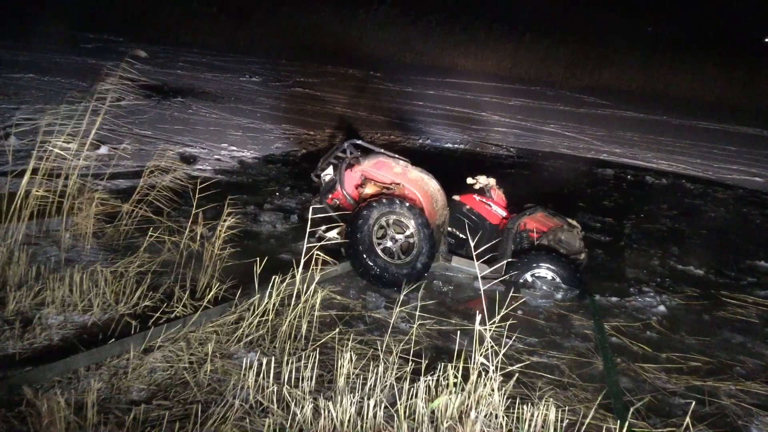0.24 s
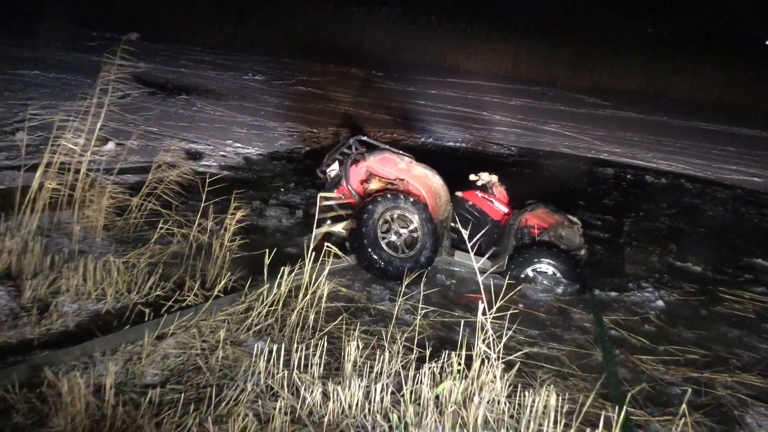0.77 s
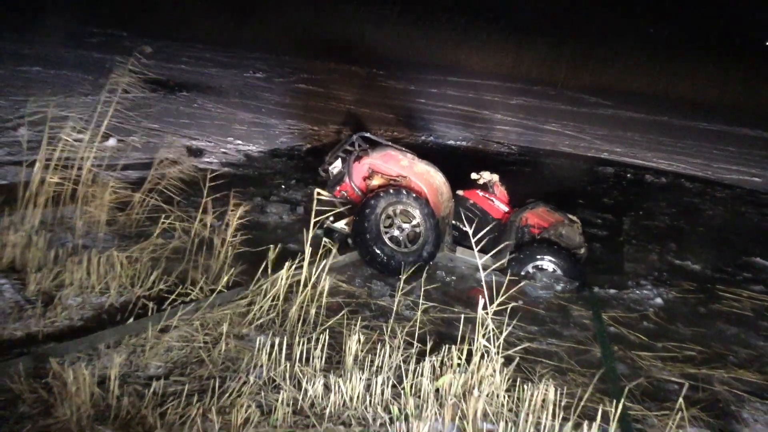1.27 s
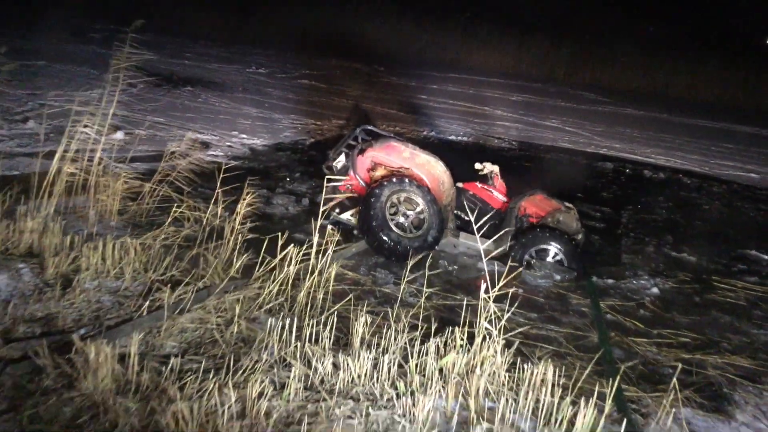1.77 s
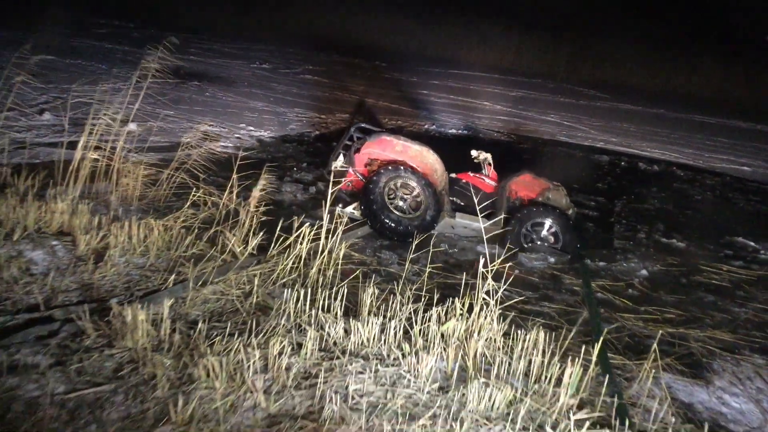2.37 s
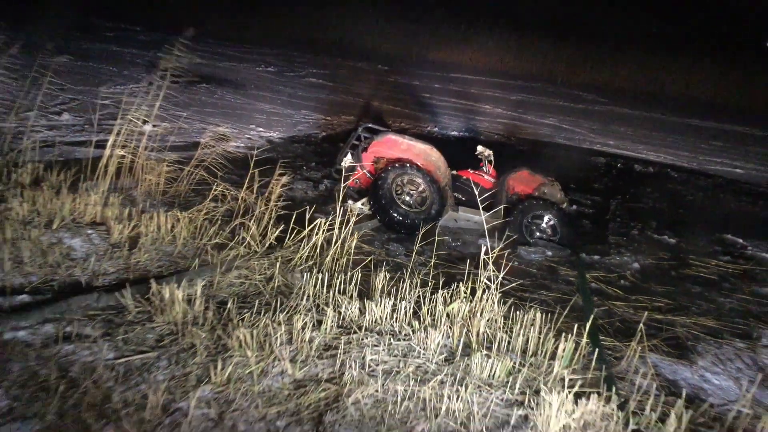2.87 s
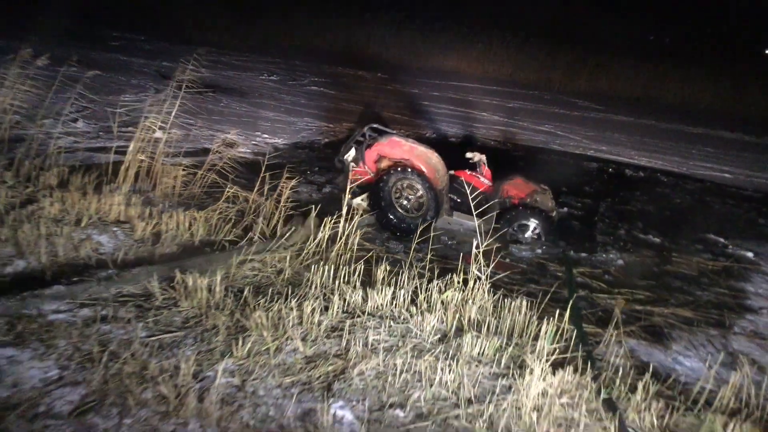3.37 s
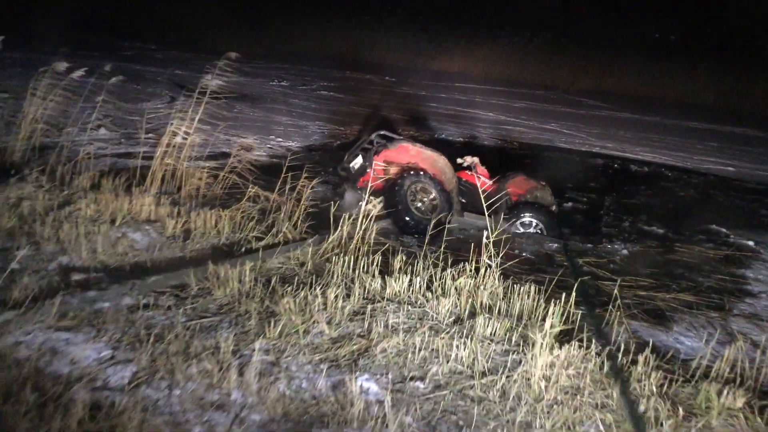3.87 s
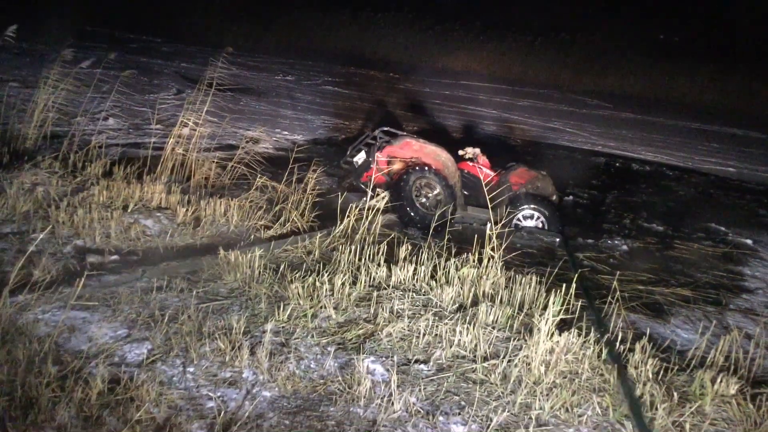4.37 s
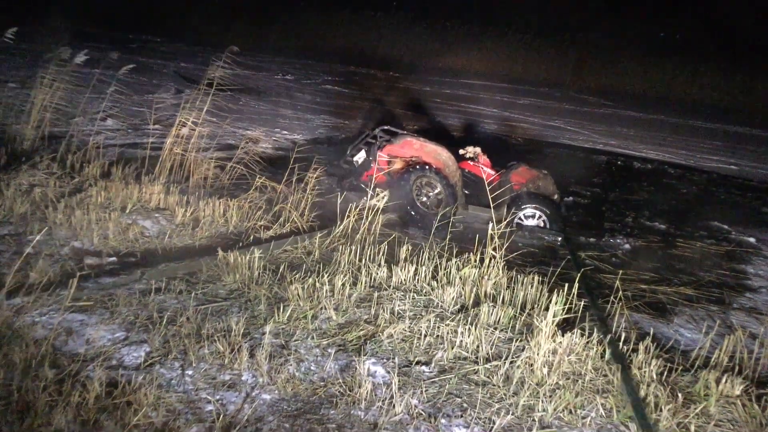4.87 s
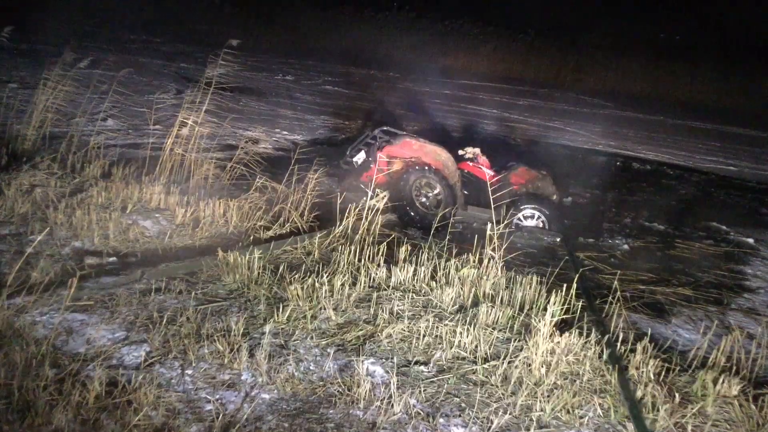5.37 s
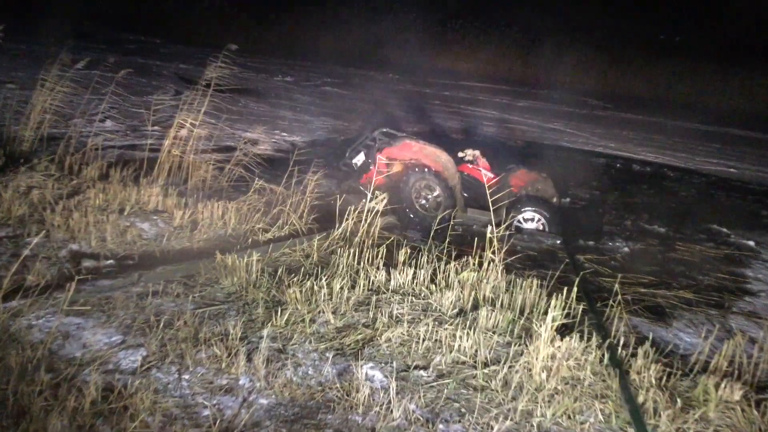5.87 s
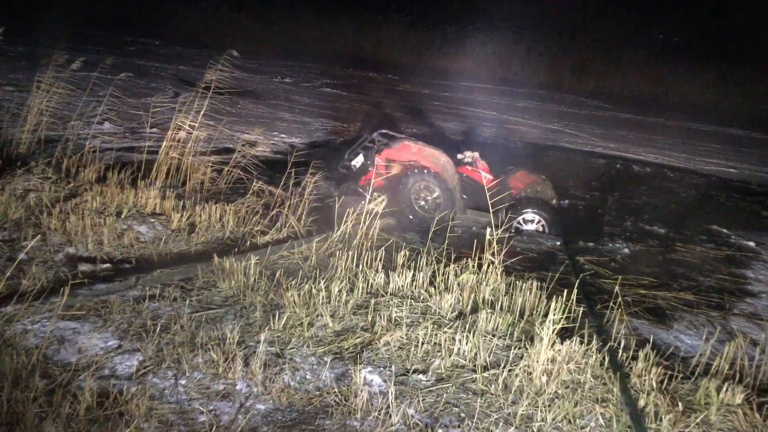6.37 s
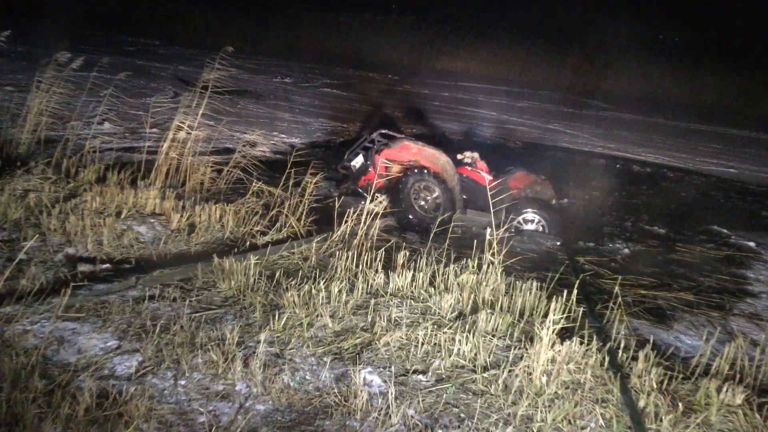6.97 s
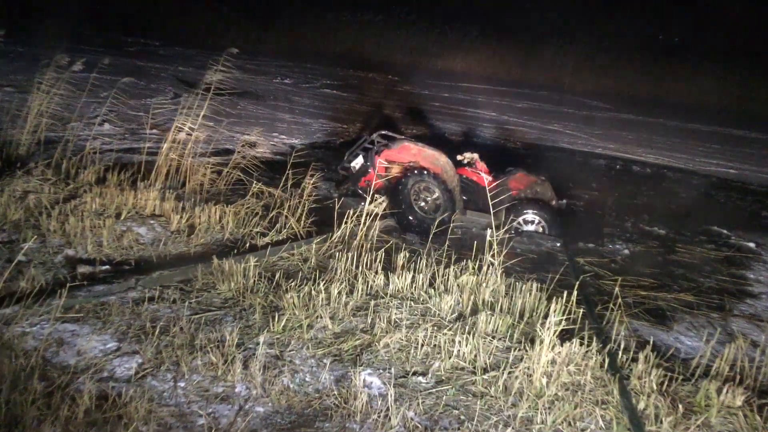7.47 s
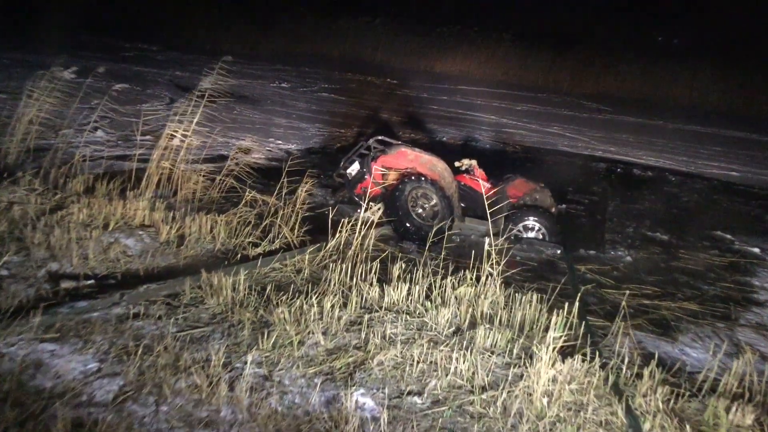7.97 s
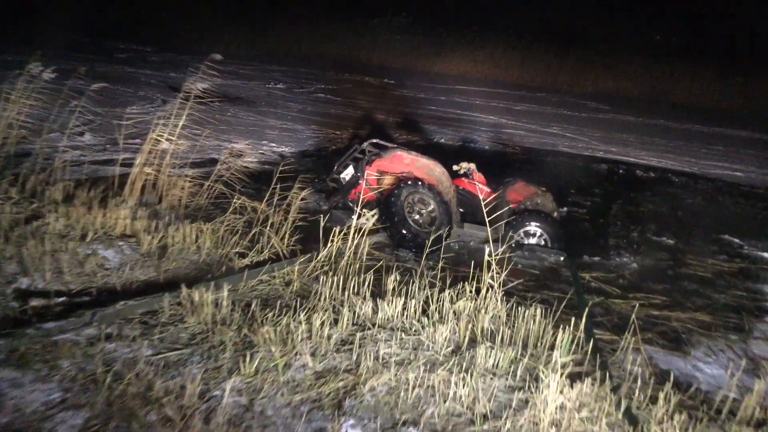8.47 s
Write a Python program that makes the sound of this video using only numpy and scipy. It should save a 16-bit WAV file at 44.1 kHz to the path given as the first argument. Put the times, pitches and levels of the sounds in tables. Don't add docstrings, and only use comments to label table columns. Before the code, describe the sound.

A small microphone, handled by its holder, picks up an engine a little way off in open night air. The engine sags, surges to an even throaty hum with rasp and faint hiss, stays there, then drops to slow uneven puffing. Close scuffs and tiny squeaks come first, then a run of low thuds with loose-part ticks, a loud near-clipping knock during the hold, and scattered bumps and brushes later.

```python
import sys
import numpy as np
from scipy import signal
from scipy.fft import rfft, irfft, next_fast_len
from scipy.io import wavfile
from scipy.ndimage import uniform_filter1d, map_coordinates

SR = 44100
rng = np.random.default_rng(int(sys.argv[2]) if len(sys.argv) > 2 else 0)


def to_linear_factor(level_db):
    exponent = np.asarray(level_db, float) / 20
    return 10 ** exponent


def persist_wave(psi):
    counts = np.round(np.clip(psi, -1, 1) * 32767).astype(np.int16)
    wavfile.write(sys.argv[1], SR, np.atleast_2d(counts).T)


N = 384993
STEP = 64

# start in seconds, length in seconds, level in dB, tilt in dB per octave.
SCUFFS = [
    (-.04, .14, -43.5, 0),
    (0.094, 0.1, -43.5, -2),
    (6.788, 0.18, -60.5, 6.5),
    (6.946, .25, -66, 7),
    (8.378, 0.17, -52, -3),
]
# frequency in Hz, level in dB.
RUSTLE_SPECTRUM = [(710, -40), (1200, -12), (1570, -2.5), (2590, -8), (3210, -2.5), (4110, -5.5),
                   (4430, -3.5), (5310, -12.5), (12900, -22.5), (15500, -53)]
# start in seconds, length in seconds, pitch in Hz, level in dB.
SQUEAKS = [(.012, .032, 3300, -36), (.018, .03, 1600, -36), (.035, .03, 4420, -40), (.033, .042, 2980, -39),
           (.053, .025, 1600, -41), (.068, .025, 3450, -43), (.097, .055, 3800, -43),
           (.128, .035, 2400, -43), (0, .018, 4400, -46), (.125, .035, 4400, -46), (.358, .005, 3600, -41),
           (.37, .006, 3350, -40), (6.82, .06, 3750, -54), (6.86, .11, 3780, -59.5), (6.95, .27, 3950, -62),
           (.632, .02, 4300, -45), (8.42, .11, 3250, -54), (8.42, .1, 3950, -56), (8.46, .07, 5050, -58),
           (8.45, .06, 6200, -62)]

# time in seconds, peak in dB.
TICKS = [(0.8587, -30.5), (0.8736, -41), (0.8838, -41.5), (0.9314, -37), (1.0523, -31.5), (1.0648, -42.5),
         (1.091, -39.5), (1.101, -34), (1.12, -36.5), (1.1383, -41), (1.2274, -42), (1.332, -36.5),
         (1.3697, -44), (3.9801, -26), (3.998, -36.5), (4.0335, -38.5), (4.0678, -44.5), (4.124, -38.5),
         (5.6784, -35), (5.7374, -43.5), (5.7446, -35), (5.763, -39.5), (5.8231, -45), (5.8778, -41.5),
         (5.8849, -39.5), (6.1486, -41), (6.7163, -40.5), (7.614, -42), (7.6333, -42), (8.2214, -45.5)]
# start in seconds, length in seconds, peak in dB, fading in dB per second.
RATTLES = [
    (1.1088, .15, -45, 30),
    (1.344, .2, -48, 0),
    (4.0081, .02, -27, 600),
    (5.6898, .07, -45, 20),
    (5.9186, .06, -43, 40),
    (6.6593, .03, -45, 0),
    (6.7613, .12, -50, 0),
    (7.342, .22, -47, 5),
    (7.6514, .02, -54, 0),
    (8.4831, .04, -51, 0),
]
# frequency in Hz, level in dB.
TICK_SPECTRUM = [(2000, -28), (4500, 0), (6000, -0.5), (9000, 3), (12500, -1), (15000, -11.5)]

# start in seconds, pitch in Hz, level in dB, decay in seconds.
BOOMS = [(0.821, 136, -21.5, 0.046), (1.03, 389.5, -17.5, 0.021), (1.039, 108.7, -8, 0.03),
         (3.981, 417, -19, 0.018), (3.991, 80.5, -13.5, 0.049), (3.9625, 200, -2.5, 0.018),
         (3.963, 600.6, -14, 0.015), (3.985, 190, -12, .03), (5.9, 331.2, -24, .03),
         (6.333, 126.4, -21.5, 0.021), (6.65, 263.7, -16, 0.024), (6.654, 109, -21, 0.036)]
# start in seconds, thud in dB, scrape in dB, scrape length in seconds,
# scrape tilt in dB per octave.
KNOCKS = [(0.354, -24.5, -40.5, 0.058, 0), (0.441, -24, -41.5, 0.021, -2.5),
          (0.626, -28.5, -34.5, 0.014, 0.5), (0.64, -29.5, -39, 0.026, 3), (.812, -22, -39, 0.041, -1),
          (0.858, -35, -40, 0.027, 1.5), (.95, -29, -49, 0.015, 0.5), (.998, -20, -42, .02, 0),
          (1.028, -19, -27, 0.036, -0.5), (3.96, -21.5, -22.5, 0.017, -6), (3.979, -14.5, -23, 0.028, -3.5),
          (6.066, -23, -30, 0.018, 4), (6.33, -19, -36.5, 0.02, -0.5), (6.353, -26, -38.5, 0.019, 0),
          (6.646, -19.5, -37, 0.025, -1.5), (6.678, -25.5, -36.5, 0.022, 0), (8.724, -42, -54.5, 0.012, 3)]
# frequency in Hz, level in dB.
THUD_SPECTRUM = [(30, -27), (70, -1), (130, 8.5), (250, 3), (400, -1.5), (600, -22), (1000, -45),
                 (2000, -84)]
SCRAPE_SPECTRUM = [(400, -32), (700, 6), (1500, 2.5), (2500, -2), (3500, -5.5), (4500, -10.5),
                   (5600, -16.5), (9000, -23.5), (13000, -27), (15800, -40)]
THUD_HZ = 351.4

# time in seconds, firing rate in Hz, gas flow in dB under full throttle,
# strength of the firings in dB over the usual.
SPEED = [(0.0, 102.5, 0.5, -12.5), (0.18, 97.77, -4, 2.5), (0.77, 71.4, -9.5, 1), (1.06, 62.63, -8, 1.5),
         (1.21, 71.24, -4.5, 1), (1.82, 117, 2, -4), (1.98, 130.5, 2.5, 3), (2.1, 137.5, 1, -1.5),
         (2.4, 138.6, 0, 0), (5.3, 138.5, 0, 0), (5.45, 134.9, 2, -2.5), (5.76, 119.1, -2, 3),
         (5.96, 105.3, -2, -2.5), (6.55, 76.93, -8.5, 1), (7.1, 58.6, -11.5, 7), (7.2, 57.37, -9, -8),
         (7.75, 53.43, -8, -0.5), (8.73, 52.4, -11, 0)]
FULL_CYCLE_HZ = 34.6
HUNT_HZ = .15
UNEVEN_DB = 12.5
PUTTER = .8

# frequency in Hz, level in dB.
PIPE_TONE = [(52, -23.5), (57, -27), (61.5, -16), (68, -24), (84, -17.5), (110, -19.5), (127, -10.5),
             (138, -11)]
PIPE_OCTAVE = [(110, -36), (130, -27), (160, -44.5), (182, -23), (196, -17.5), (225, -28.5), (250, -27),
               (276, -44.5)]
# multiple, level in dB.
LOW_ORDERS = [(1, -34.5), (2, -35.5), (3, -18), (5, -25.5), (6, -20), (7, -29), (9, -22), (10, -36),
              (11, -24.5), (12, -34.5), (13, -33), (14, -50), (15, -40), (16, -42)]
# multiple, excess in dB.
STANDOUTS = [(17, 6.5), (19, 5.5), (21, 2.7), (22, 4.6), (23, 11), (26, 8), (28, 1.6), (29, 4.9), (31, 6),
             (32, 11), (34, 4), (35, 4.9), (36, 8.6), (39, 8), (43, 5.3), (44, 9.1), (48, 11.7)]
HIGH_DB, HIGH_STEP_DB = -52, -0.06
# frequency in Hz, level in dB.
GEAR_LINES = [(1766, -71), (1803, -67.5), (1938, -55.5), (1976, -64), (2116, -58), (2148, -62),
              (2288, -57.5), (2498, -64.5), (2562, -61), (2982, -69.5), (3052, -61.5), (3596, -67),
              (4387, -71), (5120, -68.5)]

# frequency in Hz, level in dB per Hz.
RUMBLE_SPECTRUM = [(15, -54), (25, -16), (43, -5), (71, -7), (100, -5), (135, -8.5), (172, -12), (339, -15),
                   (442, -30.5), (600, -31.5), (780, -67.5), (1320, -120)]
GROWL_SPECTRUM = [(250, -32), (380, 3.5), (550, -3.5), (800, -12), (1100, -11), (1600, -44.5)]
# frequency in Hz, level in dB.
RASP_SPECTRUM = [(240, -30), (400, -4.5), (502, -15), (782, -13), (959, -16), (1090, -14), (1570, -15.5),
                 (1680, -18.5), (1770, -17), (2190, -19.5), (2820, -24.5), (3100, -23.5), (3370, -27),
                 (5190, -35.5), (7000, -46.5), (9100, -72.5), (15400, -120)]
HISS_SPECTRUM = [(3240, -24), (5500, -3), (6920, -7.5), (7750, -6), (8670, -2.5), (11400, -8.5),
                 (13900, -20.5), (15500, -27.5)]
ORDERS_DB, ORDERS_GROW = -27, 0.32
RUMBLE_DB, RUMBLE_GROW, OVERRUN_DB = -13.5, 0.54, 3.5
RASP_DB, HISS_DB, HISS_GROW = -37, -58, 1.56

# frequency in Hz, level in dB.
MICROPHONE = [(10, -8), (35, -18.0), (55, -0.5), (13500, -2.5), (15700, -5.0)]


def unit(x):
    return x / np.sqrt(np.mean(x ** 2) + 1e-20)


def along(points, hz):
    f, v = np.transpose(points)
    return np.interp(np.log(hz + 1), np.log(f + 1), v)


def curves(rows):
    s, *cols = np.transpose(rows)
    return [np.interp(np.arange(N) / SR, s, c) for c in cols]


def slow(rate):
    knots = rng.standard_normal(400)
    return map_coordinates(knots, [np.arange(0, N + STEP, STEP) * rate / SR], mode="wrap")


def fine(coarse):
    return np.interp(np.arange(N) / STEP, np.arange(len(coarse)), coarse)


def wobble(rate):
    return fine(slow(rate))


def coloured(x, points, tilt_db=0):
    m = next_fast_len(len(x) + 4096)
    hz = np.fft.rfftfreq(m, 1 / SR)
    gain_db = along(points, hz) + tilt_db * np.log2((hz + 1) / 1000)
    return irfft(rfft(x, m) * to_linear_factor(gain_db), m)[:len(x)]


def noise(points):
    return unit(coloured(rng.standard_normal(N), points))


def add(track, s, x):
    i = round(s * SR)
    x = x[max(-i, 0):][:len(track) - max(i, 0)]
    track[max(i, 0):][:len(x)] += x


def scuffs():
    out = np.zeros(N)
    for s, length, db, tilt_db in SCUFFS:
        n = round(length * SR)
        grain = rng.standard_normal(SR // 2)[:n] * to_linear_factor(2.4 * wobble(150)[:n])
        rustle = unit(coloured(grain, RUSTLE_SPECTRUM, tilt_db))
        add(out, s, to_linear_factor(db) * np.hanning(n) ** 0.33 * rustle)
    return out


def squeaks():
    out = np.zeros(N)
    for s, length, hz, db in SQUEAKS:
        n = round(length * SR)
        pitch_hz = hz * (1 + .014 * wobble(30)[:n] + .012 * wobble(250)[:n])
        slips = .7 + .35 * wobble(180)[:n]
        tone = np.sin(2 * np.pi * np.cumsum(pitch_hz) / SR)
        add(out, s, to_linear_factor(db) * slips * np.hanning(n) ** .4 * tone)
    return out


def ticks():
    out, t = np.zeros(N), np.arange(64) / SR
    clicks = list(TICKS)
    for s, length, db, fading_db in RATTLES:
        period = 1 / np.interp(s, *np.transpose(SPEED)[:2])
        scatter = rng.standard_normal((30, 2))
        scatter[0] = 0
        for after, (late, size) in zip(np.arange(0, length, period), scatter):
            clicks.append((s + after + .0008 * late, db - fading_db * after - 4 * abs(size)))
    grit = rng.standard_normal((200, len(t)))
    for (s, db), rattle in zip(clicks, grit):
        click = .2 * rattle * np.exp(-t / .0003)
        click[0] = 1
        add(out, s, to_linear_factor(db + 12.0) * click)
    return coloured(out, TICK_SPECTRUM)


def booms():
    out, t = np.zeros(N), np.arange(SR // 4) / SR
    for s, hz, db, decay in BOOMS:
        cycles = np.cumsum(hz * (.88 + .25 * np.exp(-t / .02))) / SR
        swell = (1 - np.exp(-t / 0.0058)) * np.exp(-t / decay)
        add(out, s, to_linear_factor(db + 11.5) * swell * np.sin(2 * np.pi * cycles))
    return out


def knocks():
    out, t = np.zeros(N), np.arange(SR // 4) / SR
    for s, thud_db, scrape_db, length, tilt_db in KNOCKS:
        cycles = np.cumsum(THUD_HZ * (0.7 + 0.36 * np.exp(-t / 0.04))) / SR
        lumps = unit(coloured(rng.standard_normal(len(t)), THUD_SPECTRUM))
        swell = (1 - np.exp(-t / (0.13 * length))) * np.exp(-t / (1.16 * length))
        thud = (np.sin(2 * np.pi * cycles) + 0.71 * lumps) * swell
        hold = (1 - np.exp(-t / (0.04 * length))) * np.exp(-t / 0.1) / (1 + (t / length) ** 4)
        grit = rng.standard_normal(len(t)) * to_linear_factor(2.9 * wobble(250)[:len(t)])
        scrape = unit(coloured(grit, SCRAPE_SPECTRUM, tilt_db)) * hold
        add(out, s, to_linear_factor(thud_db + 8.5) * thud + to_linear_factor(scrape_db) * scrape)
    return out


def gas_noise(turn, firing_hz, flow_db, uneven_db):
    slack = 1 - firing_hz / 4 / FULL_CYCLE_HZ
    overrun = np.clip(-uniform_filter1d(np.gradient(firing_hz) * SR, size=8000) / 40, 0, 1)
    rumble_db = RUMBLE_DB + RUMBLE_GROW * flow_db + OVERRUN_DB * overrun + 0.35 * uneven_db * wobble(1.975)
    rumble = to_linear_factor(rumble_db - 11.0 + 1.6 * wobble(13)) * noise(RUMBLE_SPECTRUM)
    rumble *= 1 + PUTTER * slack * (np.cos(4 * turn) + .5 * np.cos(2 * turn))

    pattern = rng.standard_normal(1024)
    clatter = np.interp(turn / (2 * np.pi) % 1 * 1023, np.arange(1024), pattern)
    clatter = unit(coloured(clatter, RASP_SPECTRUM, 1.5))
    throb = 1 + 0.095 * np.cos(4 * turn) + 0.11 * np.cos(turn) + 0.074 * np.cos(3 * turn)
    rasp_db = RASP_DB + flow_db
    rasp = to_linear_factor(rasp_db - 2.5 + 0.75 * wobble(9)) * (throb * noise(RASP_SPECTRUM) + .55 * clatter)

    growl = to_linear_factor(rasp_db - 21.5 + 25.0 * slack + 3 * wobble(14)) * noise(GROWL_SPECTRUM)
    hiss = to_linear_factor(HISS_DB + HISS_GROW * flow_db - 0.8 + .7 * wobble(4.4)) * noise(HISS_SPECTRUM)
    return rumble + rasp + growl + hiss


def shaft_orders(turn, cycle_hz, orders_db):
    at = np.minimum(np.arange(0, N + STEP, STEP), N - 1)
    hz, level_db = cycle_hz[at], orders_db[at]
    slack = np.clip(1 - hz / FULL_CYCLE_HZ, 0, 1)
    out = np.zeros(N)
    standouts = dict(STANDOUTS)
    high = [(k, HIGH_DB - HIGH_STEP_DB * (k - 17) + standouts.get(k, 0)) for k in range(17, 49)]
    for k, db in LOW_ORDERS + high:
        if k <= 16:
            slide_db = 0.5 * (along(RUMBLE_SPECTRUM, k * hz) - along(RUMBLE_SPECTRUM, k * FULL_CYCLE_HZ))
            beat_db = 16 * slack if k % 4 == 0 else -12 * slack
            shift_db = level_db + 15 + slide_db + beat_db
        else:
            shift_db = -10 - 45 * slack
        drift = rng.uniform(0, 2 * np.pi) + (.1 + 1.7 * slack) * slow(9)
        flutter_db = (.9 + 2.5 * slack) * slow(5)
        out += fine(to_linear_factor(db + shift_db + flutter_db)) * np.sin(k * turn + fine(drift))
    for line_hz, db in GEAR_LINES:
        strength = to_linear_factor(db + 2.0 - 57 * slack + 1 * slow(5.9))
        out += fine(strength) * np.sin(line_hz / FULL_CYCLE_HZ * turn + fine(.6 * slow(12)))
    load = np.clip(uniform_filter1d(np.gradient(hz) * SR / STEP, size=100) / 20, 0, 1)
    whine = to_linear_factor(-56.5 - 8.6 * slack + 16 * load + 4.6 * slow(15))
    return out + fine(whine) * np.sin(20.2 * turn + fine(1.6 * slow(30)))


def firing_tones(turn, firing_hz, strength_db, uneven_db):
    tone_db = along(PIPE_TONE, firing_hz) + strength_db - uneven_db * np.abs(wobble(7.9))
    octave_db = along(PIPE_OCTAVE, 2 * firing_hz) + 0.37 * strength_db - uneven_db * np.abs(wobble(4.9))
    tone = to_linear_factor(tone_db + 0.75 * wobble(9.3)) * np.sin(4 * turn + 0.028 * wobble(27))
    octave = to_linear_factor(octave_db + 2.1 * wobble(12)) * np.sin(8 * turn + 1 + 0.32 * wobble(12))
    return tone + octave


def engine():
    firing_hz, flow_db, strength_db = curves(SPEED)
    firing_hz = uniform_filter1d(firing_hz, size=2500) + HUNT_HZ * wobble(2.5)
    cycle_hz = firing_hz / 4
    turn = 2 * np.pi * np.cumsum(cycle_hz) / SR
    uneven_db = UNEVEN_DB * (1 - cycle_hz / FULL_CYCLE_HZ)
    orders_db = ORDERS_DB + ORDERS_GROW * flow_db + 1.0 * wobble(5)
    tones = firing_tones(turn, firing_hz, strength_db, uneven_db) + shaft_orders(turn, cycle_hz, orders_db)
    return np.sqrt(2) * tones + gas_noise(turn, firing_hz, flow_db, uneven_db)


def scene():
    return (scuffs() + squeaks() + ticks() + booms() + knocks() + engine())[None]


def band_limit(x):
    return signal.sosfilt(signal.butter(12, 15730, fs=SR, output="sos"), x)


def record(dry):
    x = coloured(dry[0], MICROPHONE)[None]
    x = x / (1 + np.abs(x / .99) ** 12) ** (1 / 12)
    return band_limit(x)


dry = scene()
out = record(dry)
persist_wave(out)
```